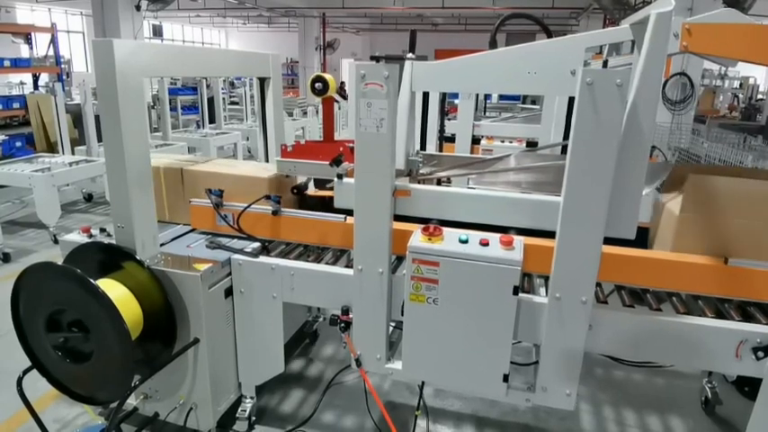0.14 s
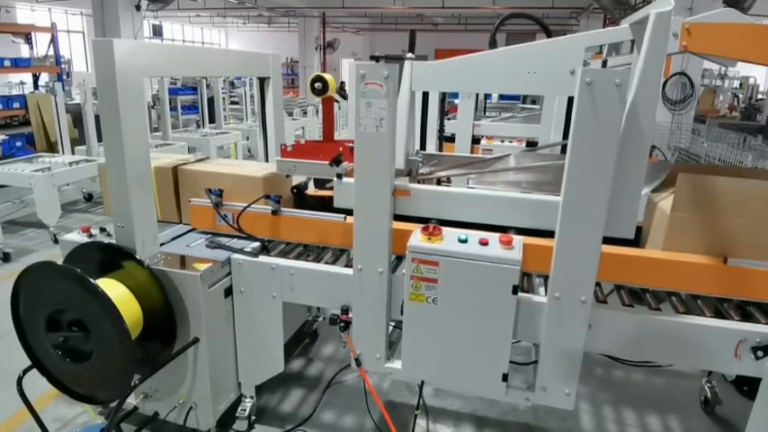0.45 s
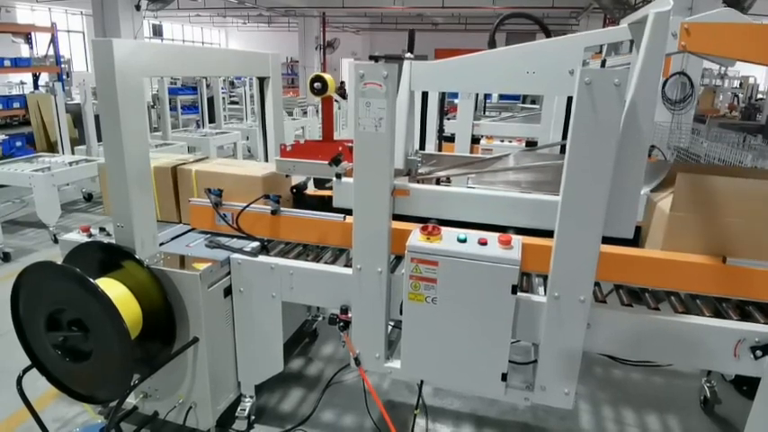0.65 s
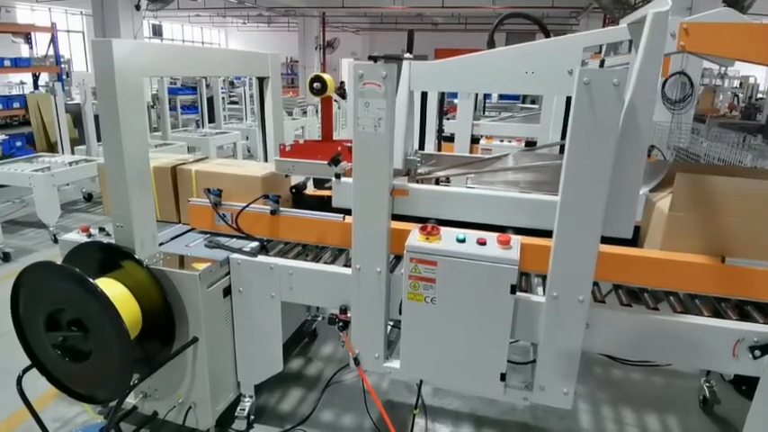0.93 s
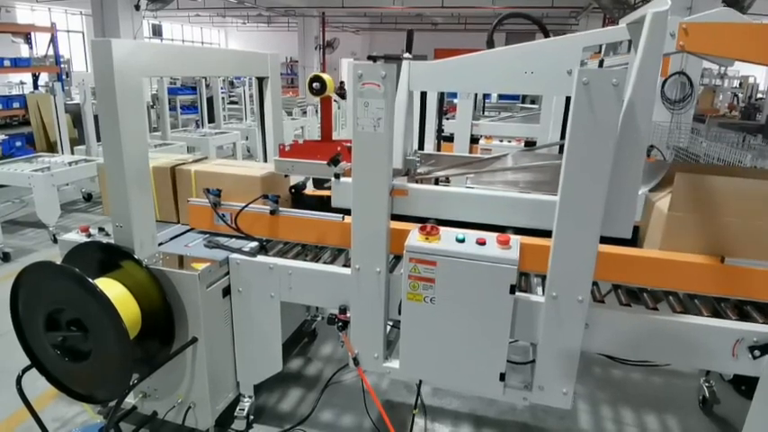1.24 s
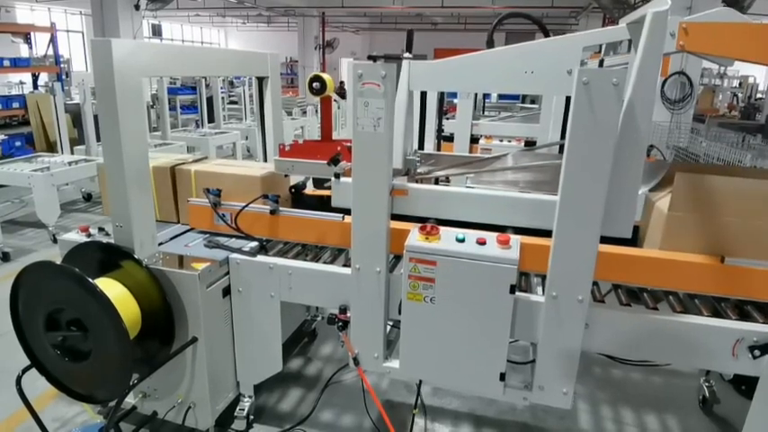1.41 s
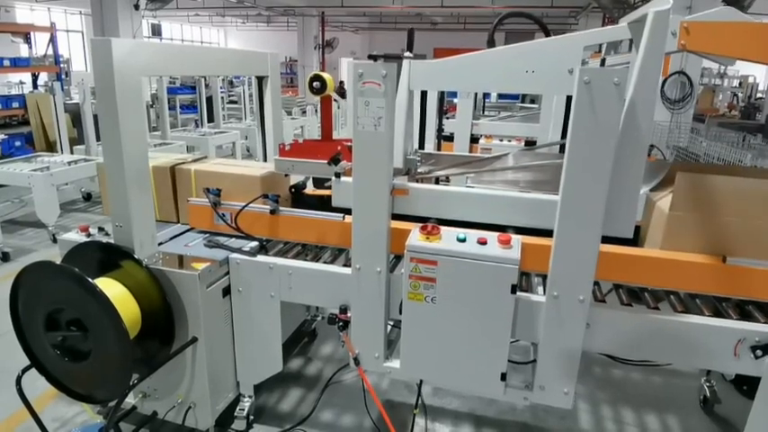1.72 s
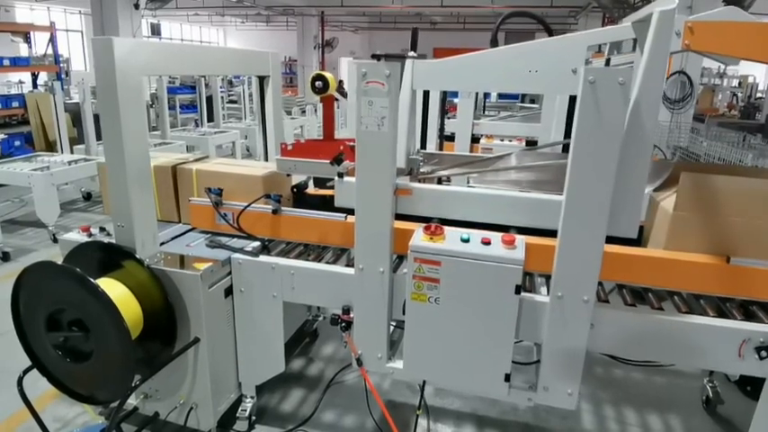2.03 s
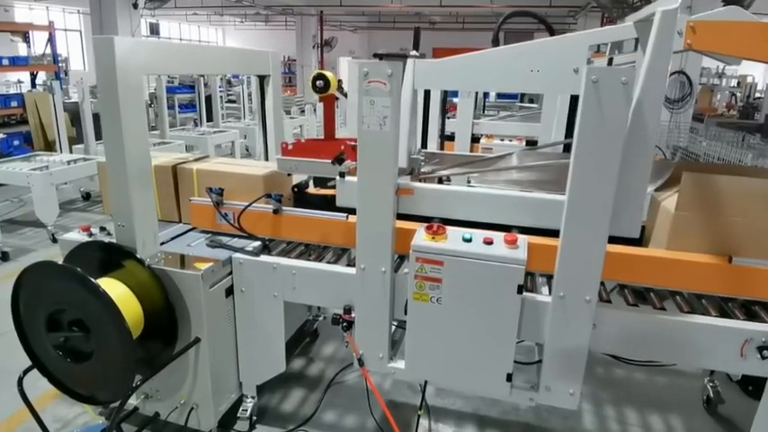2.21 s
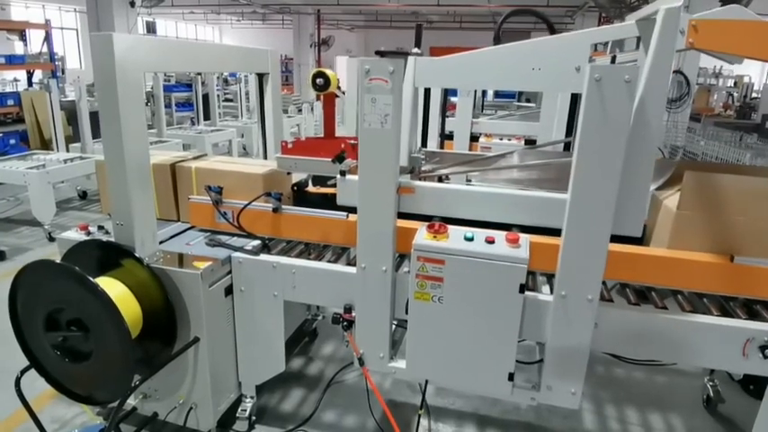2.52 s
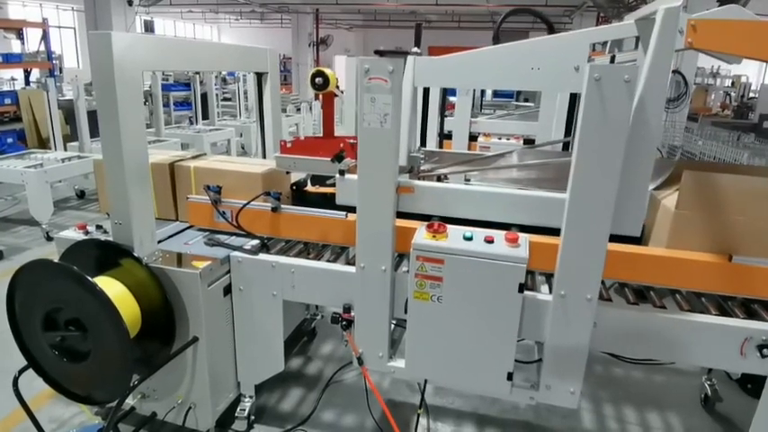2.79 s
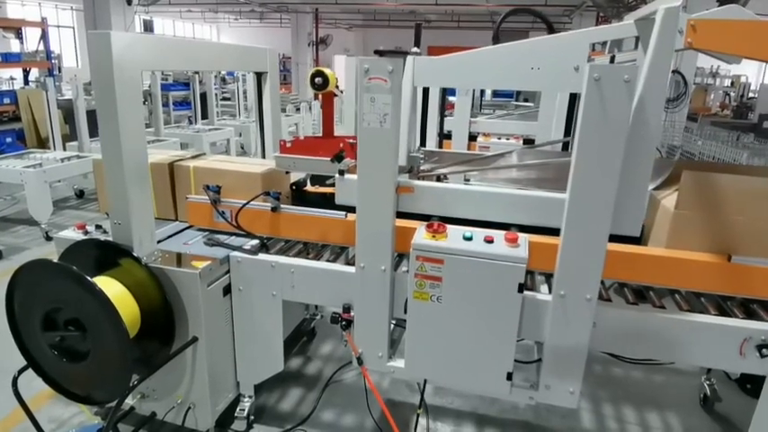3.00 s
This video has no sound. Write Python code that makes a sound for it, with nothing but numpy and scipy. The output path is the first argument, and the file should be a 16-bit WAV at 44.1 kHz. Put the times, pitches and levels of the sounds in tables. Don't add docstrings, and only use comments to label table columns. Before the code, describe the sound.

Close up in an echoing factory hall, a packing machine fires a dense burst of air and metal clacks, pauses, clacks again, whistles faintly and hums under load, caught by a small handheld microphone.

```python
import sys
import numpy as np
from scipy import signal
from scipy.fft import rfft, irfft, next_fast_len
from scipy.io import wavfile
from scipy.ndimage import uniform_filter1d, map_coordinates

SR = 44100
rng = np.random.default_rng(int(sys.argv[2]) if len(sys.argv) > 2 else 0)


def store_pcm(level_fs):
    pcm = np.round(np.clip(level_fs, -1, 1) * 32767).astype(np.int16)
    wavfile.write(sys.argv[1], SR, np.atleast_2d(pcm).T)


def volts(x):
    e = np.asarray(x, float) / 20
    return 10 ** e


N = 138915
TIME = np.arange(N) / SR
TOUCH_S = 0.0012


def unit(x):
    return x / np.sqrt(np.mean(x ** 2) + 1e-20)


def along(points, hz):
    f, v = np.transpose(points)
    return np.interp(np.log(hz + 1), np.log(f + 1), v)


def curve(rows):
    return np.interp(TIME, *np.transpose(rows))


def wobble(rate):
    knots = rng.standard_normal(int(N * rate / SR) + 40)
    return map_coordinates(knots, [np.arange(N) * rate / SR])


def filtered(x, response):
    m = next_fast_len(len(x) + 8192)
    return irfft(rfft(x, m) * response(np.fft.rfftfreq(m, 1 / SR)), m)[:len(x)]


def rush(spectrum, patchy_db):
    z = signal.stft(rng.standard_normal(N), nperseg=512)[2]
    patches = uniform_filter1d(rng.standard_normal(z.shape), size=4, axis=0)
    patches = unit(uniform_filter1d(patches, size=7, axis=1))
    x = signal.istft(z * volts(patchy_db * patches), nperseg=512)[1][:N]
    return unit(filtered(x, lambda hz: volts(along(spectrum, hz))))


def shape(t, rise, hold, t60):
    attack = np.clip(t / rise, 0, 1) ** 2
    return attack * volts(-60 * np.clip(t - rise - hold, 0, None) / t60)


def tone(hz, drift_hz, flutter_db):
    phase = 2 * np.pi * np.cumsum(hz + drift_hz * wobble(16)) / SR
    return np.sqrt(2) * volts(flutter_db * wobble(6.8)) * np.sin(phase)


# start_s, level_db, rise_s, hold_s, t60_s
CYLINDER_STROKES = [(0.042, -47.5, 0.016, 0.028, 0.66), (0.184, -36.5, 0.022, 0.098, 0.57),
                    (0.249, -24.5, 0.035, 0.015, 0.46), (0.33, -30, 0.0053, 0.015, 0.49),
                    (0.393, -29.5, 0.0032, 0.094, 0.88), (0.525, -27.5, 0.0014, 0.0024, 0.13),
                    (0.544, -30, 0.0073, 0.029, 0.075), (.589, -33.5, 0.0026, 0.0059, 0.27),
                    (1.092, -55.5, 0.0079, 0.042, .3), (1.214, -76, .01, 0.035, 0.27),
                    (1.268, -77, 0.0093, 0.031, 0.31), (1.611, -44, 0.005, 0.015, 0.2),
                    (1.637, -39, 0.006, 0.026, .4), (1.7964, -30, 0.0024, 0.023, 0.36),
                    (1.847, -34.5, 0.011, 0.049, 0.89), (2.043, -45, 0.0062, 0.015, 0.18),
                    (2.138, -50, 0.016, 0.25, .3), (2.3585, -34, 0.0012, 0.012, 0.2),
                    (2.384, -44, 0.013, 0.033, 0.2)]


def stroke_force():
    power = sum((volts(db) * shape(TIME - s, rise, hold, t60)) ** 2
                for s, db, rise, hold, t60 in CYLINDER_STROKES)
    return np.sqrt(power)


# freq_hz, density_db (per Hz)
AIR_COLOUR = [(650, -8.5), (1100, -9.5), (1300, -7), (2530, -0.5), (3820, -6.5), (4190, -4), (6810, -9),
              (7400, -5), (7900, -11.5), (10300, -71), (17400, -120)]
# freq_hz, density_db (per Hz)
FIZZ_COLOUR = [(4710, -25), (8000, 0), (8330, 0), (9640, 6), (11200, 2), (12000, 11), (13600, 6),
               (14400, 15.5), (14600, -50)]
# start_s, level_db, hold_s
VALVE_EXHAUSTS = [
    (0.01, -52, 0.034),
    (0.966, -55, 0.09),
    (1.63, -45.5, 0.069),
    (1.801, -33, 0.035),
    (2.36, -46, .03),
]


def vented_air(force):
    puffs = sum(volts(db) * shape(TIME - s, 0.002, hold, 0.061) for s, db, hold in VALVE_EXHAUSTS)
    brightness = (force / force.max()) ** 0.12
    fizz = volts(-12.5) * (force * brightness + puffs) * rush(FIZZ_COLOUR, patchy_db=3.5)
    return force * rush(AIR_COLOUR, patchy_db=3.5) + fizz


# freq_hz, width_hz, level_db
STEEL_RESONANCES = [(2200, 195, 25), (2300, 310, 18), (2600, 130, 14.5), (2840, 190, -55),
                    (3200, 812, 25.5), (3870, 1100, 22), (4830, 860, 18), (5320, 670, 23), (6870, 1300, -5)]


def steel_rattle(force):
    contacts_per_s, ring_t60_s, scatter_db = 1100, 0.084, 12
    when, which, luck, detune = rng.random((int(contacts_per_s * N / SR), 4)).T
    life = np.arange(1200) / SR
    hz, width, db = np.array(STEEL_RESONANCES)[(which * len(STEEL_RESONANCES)).astype(int)].T
    start = (when * N).astype(int)
    size = force[start] * volts(db + scatter_db * luck ** 2)
    pitch = hz + width * (detune - 0.5)
    decay = volts(-60 * life / ring_t60_s) * (1 - np.exp(-life / TOUCH_S))
    rings = decay * np.sin(2 * np.pi * pitch[:, None] * life) * size[:, None]
    place = start[:, None] + np.arange(len(life))
    shower = np.bincount(place.ravel(), rings.ravel(), minlength=N)[:N]
    return volts(-5) * unit(shower) * np.sqrt(np.mean(force ** 2))


# start_s, peak_db, pitch_hz, push_db
FLAP_CONTACTS = [(0.2011, -40, 3020, -40), (0.2763, -24.5, 3290, -38), (0.2937, -20.5, 3205, -30),
                 (.336, -18, 3120, -37), (.358, -20.5, 2300, -41), (0.3932, -22, 2230, -19),
                 (.402, -21, 2120, -21), (.424, -21, 2300, -25), (.4525, -22, 2100, -18),
                 (.467, -31, 2300, -18), (.4832, -27, 2744, -19), (.5261, -18, 2657, -17),
                 (0.566, -23.5, 2700, -23), (.5899, -23.5, 2750, -15), (1.6203, -41, 2770, -50),
                 (1.6417, -36, 4700, -47), (1.802, -20, 2600, -32), (1.8149, -19, 3200, -28),
                 (1.836, -27, 3830, -32), (1.853, -22, 2400, -31), (1.8826, -23, 2400, -28),
                 (2.0645, -32, 2660, -41), (2.2913, -33.5, 2290, -44), (2.3601, -30.5, 3160, -40),
                 (2.408, -39.5, 3010, -39)]
# pitch_multiple, level_db
FLAP_MODES = [(.8, -8.5), (1, -0.5), (1.24, -10), (1.518, -13), (1.898, -12), (2.299, -13.5),
              (2.872, -19.5)]


def flap_clacks():
    ring_t60_s, crack_db, crack_t60_s, push_hz, push_t60_s = 0.043, -4.5, 0.012, 724, 0.011
    out, t = np.zeros(N + SR), np.arange(SR // 8) / SR
    for s, db, hz, push_db in FLAP_CONTACTS:
        ring = 0
        for multiple, level in FLAP_MODES:
            phase = 2 * np.pi * hz * multiple * t + rng.uniform(0, 2 * np.pi)
            ring = ring + volts(level + rng.normal(0, 2.07)) * np.sin(phase)
        crack = volts(crack_db - 60 * t / crack_t60_s) * rng.standard_normal(len(t))
        steel = ring * volts(-60 * t / ring_t60_s) + crack
        push = volts(push_db - 60 * t / push_t60_s) * np.sin(2 * np.pi * push_hz * t)
        out[round(s * SR):][:len(t)] += (volts(db) * steel + push) * (1 - np.exp(-t / TOUCH_S))
    return out[:N]


def blows(rows, spread, ringing):
    out, t = np.zeros(N + SR), np.arange(SR) / SR
    for s, db, hz, hold, t60 in rows:
        def body(f):
            damping = 1j * f * spread * hz
            return (damping / (hz * hz - f * f + damping)) ** 2
        push = unit(filtered(rng.standard_normal(SR), body))
        push = push + ringing * 2 * np.sin(2 * np.pi * hz * t)
        out[round(s * SR):][:SR] += volts(db) * shape(t, 0.01, hold, t60) * push
    return out[:N]


# start_s, level_db, pitch_hz, hold_s, t60_s
CARTON_BLOWS = [(.25, -34.5, 252.4, 0.13, 0.29), (.28, -33, 152.4, 0.06, 0.6),
                (.398, -33, 112, 0.039, 0.61), (.4, -30.5, 187, 0.085, 0.82), (.44, -32, 252, 0.061, 0.24),
                (.5, -37, 382.4, 0.09, 0.69), (.545, -28, 234, 0.027, 0.16),
                (.582, -24, 271.5, 0.0076, 0.32), (.6, -37.5, 118, 0.054, 1.7),
                (.72, -35, 277, 0.038, 0.18), (1.12, -30, 194.4, 0.0092, 0.098),
                (1.53, -40, 236.7, 0.059, 0.18), (1.59, -37.5, 217.3, 0.19, 0.23), (1.63, -40, 95, .03, .2),
                (1.73, -31.5, 182.4, 0.084, .2), (1.82, -39, 391, 0.053, 1.04),
                (1.833, -29, 223.5, 0.016, 0.46), (1.89, -31, 135.6, 0.12, 0.23),
                (1.96, -41, 173.7, 0.084, 0.13), (2.39, -42.5, 283.6, 0.035, 0.12)]


def carton_thumps():
    return blows(CARTON_BLOWS, spread=0.6, ringing=0.29)


# start_s, level_db, pitch_hz, hold_s, t60_s
FRAME_BLOWS = [(.085, -48, 803, 0.067, 0.71), (.2, -42, 685, 0.099, .3), (.275, -31.5, 710, 0.091, 0.79),
               (.398, -25.5, 725, 0.045, 0.41), (.525, -30.5, 699, 0.03, 0.22), (.6, -35, 1020, 0.028, 0.4),
               (1.11, -41.5, 723, 0.014, 0.19), (1.295, -46.5, 900, 0.019, 0.27),
               (1.59, -42, 705, 0.15, 0.61), (1.8, -34, 665, 0.076, 0.54), (1.87, -38, 658, 0.09, .4),
               (1.9, -38.5, 960, 0.02, 0.63), (2.37, -44, 798, 0.051, 0.081)]


def frame_knocks():
    return blows(FRAME_BLOWS, spread=0.52, ringing=0.19)


# start_s, level_db, pitch_hz, hold_s, t60_s
PANEL_RINGS = [
    (0.25, -41.5, 3250, 0.018, .2),
    (.395, -33.5, 2090, 0.071, 0.24),
    (.548, -28, 2300, 0.0085, 0.069),
    (1.22, -51.5, 2340, 0.11, 0.28),
    (1.8, -30.5, 2660, 0.011, 0.2),
    (1.812, -34.5, 3520, 0.021, 0.34),
    (2.02, -48, 2780, 0.062, 0.2),
]


def panel_rings():
    return blows(PANEL_RINGS, spread=0.22, ringing=0.07)


# start_s, level_db, pitch_hz, hold_s, t60_s
SINGING_TAILS = [
    (1.9, -48, 4580, 0.12, .5),
    (1.95, -46, 2250, 0.15, 0.3),
    (2.1, -51, 4600, .16, .3),
    (2.16, -47, 2230, .14, .2),
]


def singing_panels():
    return blows(SINGING_TAILS, spread=0.14, ringing=0.08)


# freq_hz, t60_s
HALL_DECAY = [(150, 1.0), (1000, 1), (4000, 0.76), (12000, 0.62)]


def hall_echo(x):
    hz, t, z = signal.stft(rng.standard_normal(SR), SR, nperseg=256)
    tail = signal.istft(z * volts(-60 * t / along(HALL_DECAY, hz)[:, None]), SR, nperseg=256)[1]
    delayed = np.pad(x, (600, 0))
    return signal.fftconvolve(delayed, tail / np.linalg.norm(tail))[:N]


# time_s, hum_db
MOTOR_LOAD = [
    (1.9, -69),
    (2.05, -35),
    (2.3, -36),
    (2.47, -34.5),
    (2.6, -31.5),
    (2.72, -28),
    (2.87, -29),
    (2.9, -45),
    (3.0, -51),
]
# freq_hz, density_db (per Hz)
GROWL_COLOUR = [(45, -20), (90, -6), (130, 0), (200, -30), (500, -150)]
# freq_hz, level_db (over the hum)
SHAKEN_PANEL = [(208, -14.5)]


def motor():
    hum_hz = 117.2 - 2.8 * (TIME - 2.05)
    hum = tone(hum_hz, drift_hz=1.2, flutter_db=0.43)
    growl = volts(-17) * rush(GROWL_COLOUR, patchy_db=1.2)
    panel = sum(volts(db) * tone(hz, 2.4, 2.0) for hz, db in SHAKEN_PANEL)
    return volts(curve(MOTOR_LOAD)) * (hum + growl + panel)


# time_s, level_db
LINE_ACTIVITY = [
    (0, -39.5),
    (.9, -36.5),
    (1.2, -38.5),
    (1.55, -39.5),
    (2.2, -38.5),
    (2.6, -41),
    (2.9, -43),
    (3.15, -43),
]
# freq_hz, density_db (per Hz)
RUMBLE_COLOUR = [(18, -63), (30, -66), (98, 9), (237, -1.5), (269, -1.5), (400, -12.5), (489, -35.5),
                 (521, -24.5), (963, -9), (1300, -23), (1690, -60), (2860, -120)]
# freq_hz, density_db (per Hz)
BELT_COLOUR = [(760, 0.5), (1300, -7.5), (3690, -9), (4080, -12.5), (7500, -25.5), (7970, -33.5),
               (8210, -57.5), (13600, -33), (14600, -21)]
# freq_hz, level_db
FAR_WHINES = [(534, -63), (799, -57)]


def factory():
    sway_db = 0.8
    rumble = volts(sway_db * wobble(6.29)) * rush(RUMBLE_COLOUR, patchy_db=1.2)
    belt = volts(-5.5 + sway_db * wobble(8.37)) * rush(BELT_COLOUR, patchy_db=2.5)
    whines = sum(volts(db) * tone(hz, 2.44, 0.91) for hz, db in FAR_WHINES)
    late_whine = volts(-51) * shape(TIME - 2.97, 0.05, 1, 1) * tone(290, 2, 1)
    return volts(curve(LINE_ACTIVITY)) * (rumble + belt) + whines + late_whine


def scene():
    force = stroke_force()
    near = vented_air(force) + steel_rattle(force) + flap_clacks()
    near = near + carton_thumps() + frame_knocks() + panel_rings() + singing_panels()
    return (near + volts(-11) * hall_echo(near) + motor() + factory())[None]


# freq_hz, threshold_db (over the local level)
THINNING = [(2000, -59), (2800, -7), (4500, -5), (6000, .5), (7800, 1), (8150, 4), (8600, 0), (13600, -1),
            (14000, 3)]


def thinned_band(x):
    threshold_scatter_db, top_scatter_db = 3.5, 3
    hz, _, z = signal.stft(x, SR, nperseg=2048)
    bins, frames = z.shape
    local = np.sqrt(uniform_filter1d(abs(z) ** 2, size=60, axis=0))
    uneven = unit(uniform_filter1d(rng.standard_normal((bins // 8 + 1, frames)), size=2, axis=1))
    uneven = np.repeat(uneven, repeats=8, axis=0)[:bins]
    threshold = local * volts(along(THINNING, hz)[:, None] + threshold_scatter_db * uneven)
    blocks = np.repeat(rng.standard_normal((bins // 24 + 1, frames)), repeats=24, axis=0)[:bins]
    jumpy_top = volts(top_scatter_db * blocks * (hz > 8000)[:, None])
    shade = volts(-3.5 * np.exp(-((hz - 1310) / 230) ** 2))
    low_cut = 1 / (1 + (69 / (hz + 1)) ** 2)
    band = shade * low_cut * (hz < 14150)
    kept = z * (abs(z) > threshold)
    return signal.istft(kept * jumpy_top * band[:, None], SR, nperseg=2048)[1][:N]


def top_cut(x):
    return signal.sosfilt(signal.butter(12, 14780, fs=SR, output="sos"), x)


def record(dry):
    mix = thinned_band(dry[0])[None]
    return top_cut(mix)


dry = scene()
out = record(dry)
store_pcm(out)
```